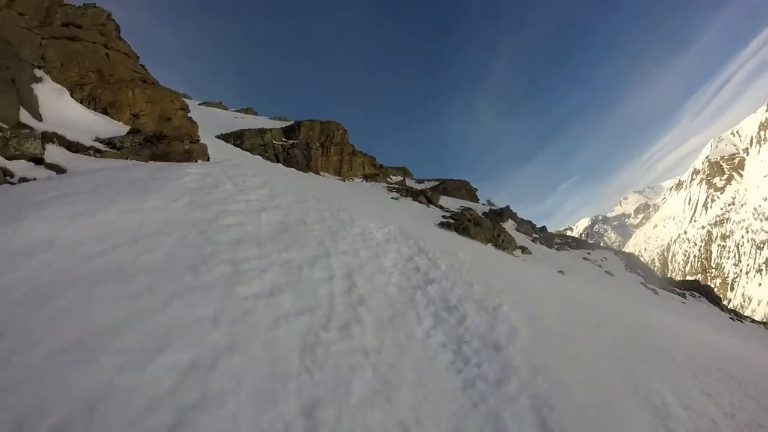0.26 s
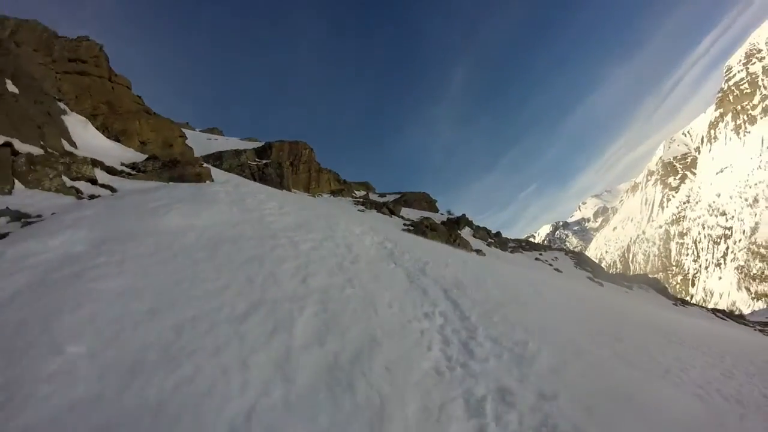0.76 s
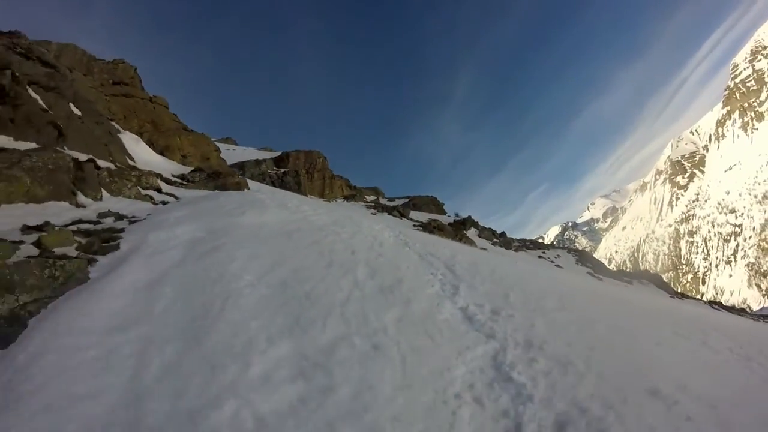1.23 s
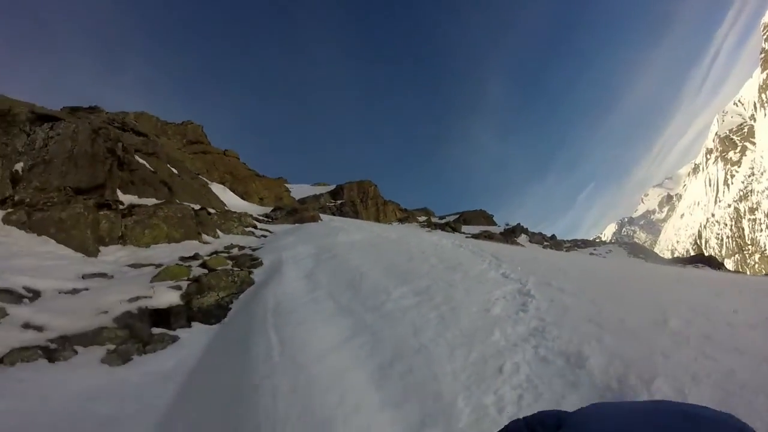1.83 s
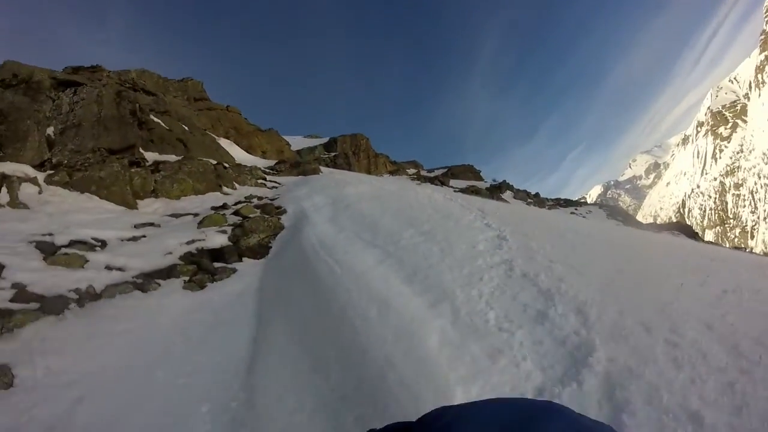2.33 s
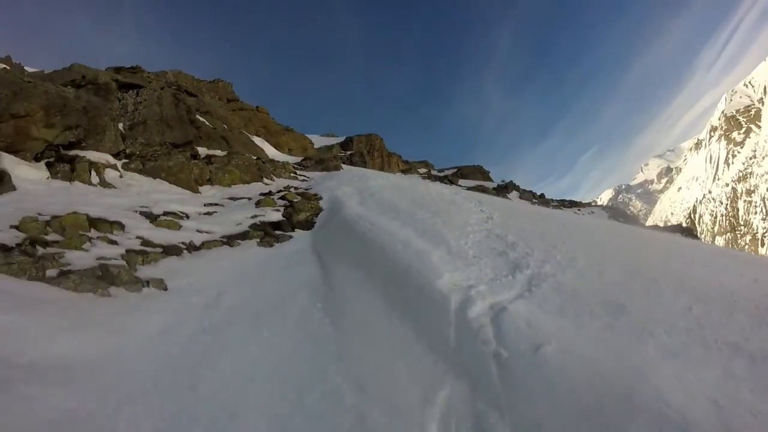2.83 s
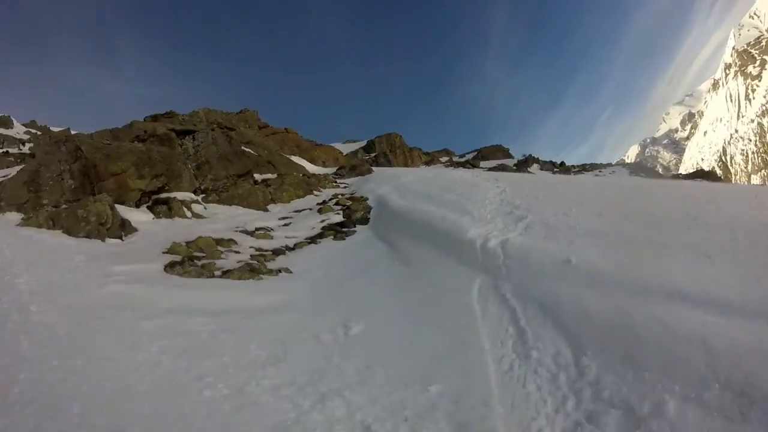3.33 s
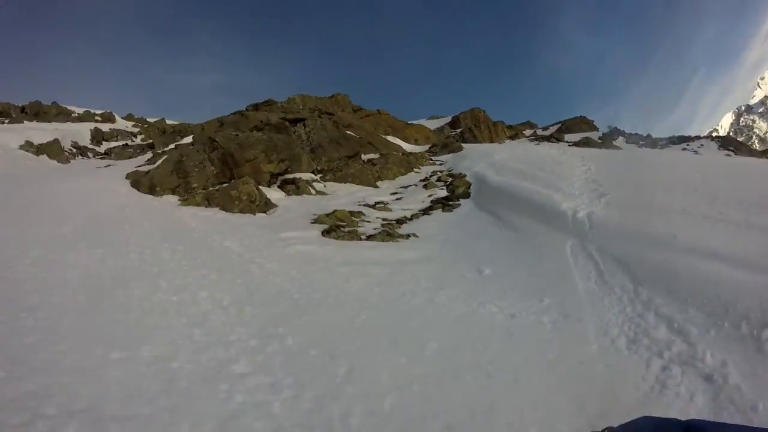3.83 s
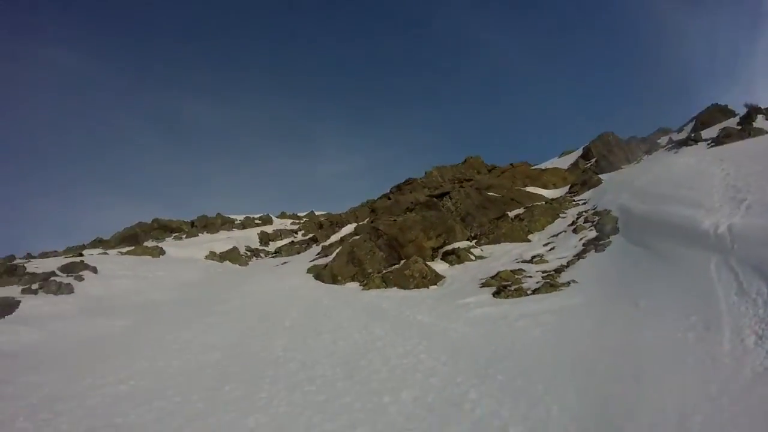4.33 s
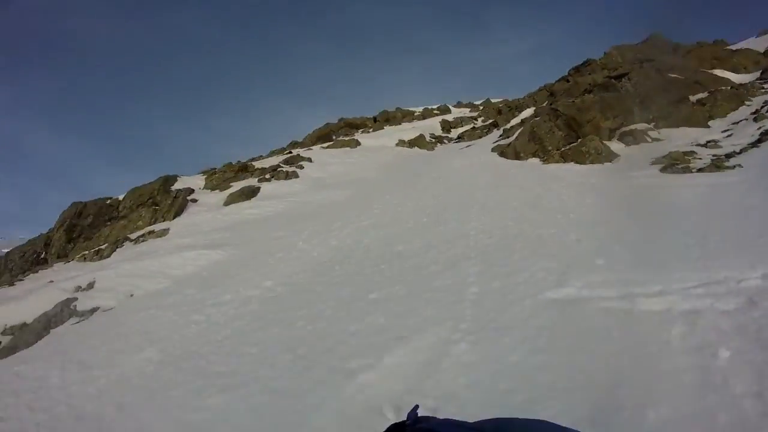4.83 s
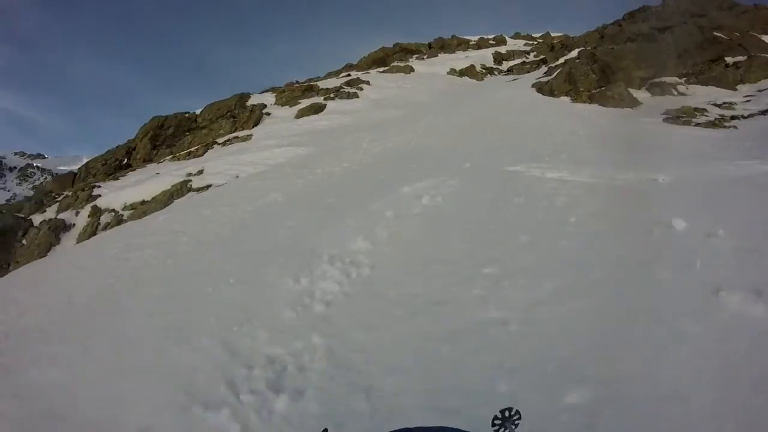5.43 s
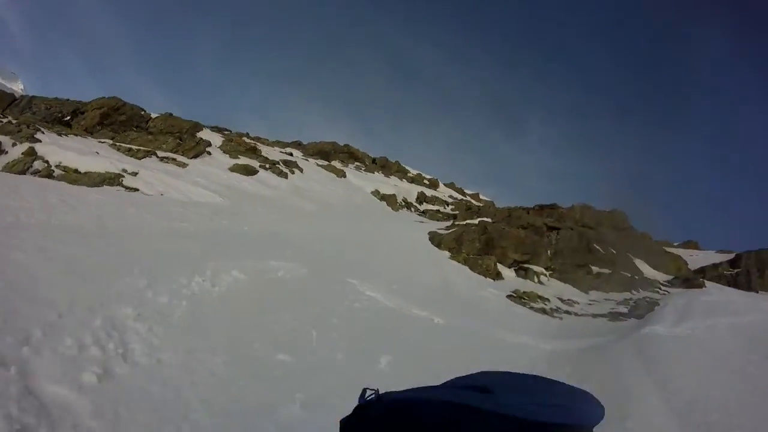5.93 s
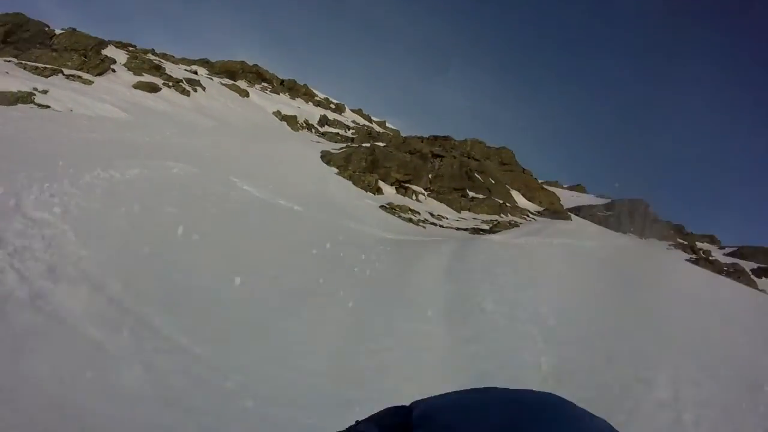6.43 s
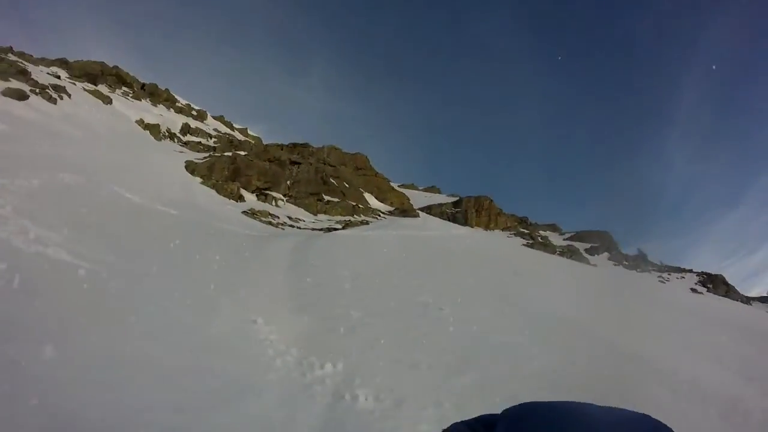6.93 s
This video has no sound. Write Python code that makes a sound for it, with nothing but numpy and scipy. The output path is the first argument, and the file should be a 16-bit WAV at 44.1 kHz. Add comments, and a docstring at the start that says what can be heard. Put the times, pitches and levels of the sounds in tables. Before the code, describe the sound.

Close, boxy and mono: ski edges crunch and hiss over crusted snow outdoors. The scraping comes in waves, one per turn, with a long soft lull, a strong surge, and two short near-silent gaps filled by bright clicks of poles, bindings or buckles. Deep wind buffeting and a shaking mount rumble underneath, swelling in gusts, and the last turn scrapes on unfinished.

```python
"""Skiing down firm snow

A skier runs down firm snow, heard by a body-worn camera in a plastic housing. The edges scrape through the
turns as filtered grains and noise, bite in narrow bands, and fall quiet when the skis are unweighted.
Gear clicks and rattles as short ringing bursts. Wind and body shake are shaped noise and decaying sines;
the housing's resonances colour the scrape, the gear and the rush of air."""
import sys
import numpy as np
from scipy import signal
from scipy.fft import rfft, irfft
from scipy.io import wavfile

SR = 44100
rng = np.random.default_rng(int(sys.argv[2]) if len(sys.argv) > 2 else 0)


def output_pcm(signal):
    """Save a mono or channel-first signal as 16-bit PCM at the path in sys.argv[1].

    Samples are clipped to [-1, 1] before scaling.
    """
    pcm = np.clip(np.atleast_2d(signal).T, -1, 1) * 32767
    wavfile.write(sys.argv[1], SR, np.round(pcm).astype(np.int16))


N = 316197
HZ = np.fft.rfftfreq(N, 1 / SR)
TIME = np.arange(N) / SR

# One curve per turn, from setting the edge to unweighting. Each row: time in seconds, edge pressure as
# level in dB, firmness of the crust in dB.
TURN_CURVES = [
    [(0.0, -32.5, 1.5), (0.25, -33, 2), (0.45, -30.5, 1), (0.75, -31, -1), (1.02, -33.5, -.5),
     (1.33, -34, -0.5), (1.62, -31, 0.5), (1.86, -34, -2.5), (2.16, -46, -4)],
    [(2.195, -44, -1.5), (2.42, -43, 1.5), (2.84, -43.5, 1), (3.04, -34, 2.5), (3.16, -27.5, 0),
     (3.6, -24.5, -3), (3.8, -29.5, 0), (4.05, -33, 1), (4.21, -46.5, 2.5)],
    [(4.6, -34.5, 0), (4.7, -34.5, 1.5), (4.8, -30.5, 2.5), (5.15, -30.5, 3), (5.58, -28, 0.5),
     (5.72, -25.5, -2), (5.97, -36, -1.5), (6.08, -36.5, -1.5), (6.15, -46.5, -2)],
    [(6.378, -32, 0.5), (6.6, -30.5, 0.5), (6.72, -27.5, -1), (6.85, -26.5, -3.5), (7.0, -29, -1),
     (7.08, -26.5, 0.5), (7.17, -28.5, -2.5)],
]


def scrape(shell_db, pressure_db, grains_per_s=3400, spread_db=1.2, hiss_db=-3, chatter_rms_db=0.84,
           patchy_rms_db=0.92, spray_grit=0.7):
    """Crust breaks in countless grains under the chattering edges and throws up a smoother spray of powder."""
    # Scraped snow. Each row: frequency in Hz, spectrum level in dB per Hz.
    snow = [(200, -14), (480, -21), (750, -11.5), (1100, -13), (1700, -3), (2400, -1.5), (3200, 2),
            (4200, -16.5), (5200, -20.5), (7200, -22), (9500, -30), (15000, -50.5)]
    # Layers following edge pressure. Each: level in dB at a steady glide, dB gained per dB of pressure.
    body_law = (-38, 0.92)
    spray_law = (-49, 0.87)
    spray_per_crust = -0.3  # dB per dB: firm crust gives more body and less powder

    sizes = gain_of(spread_db * np.minimum(rng.exponential(1, N), 5))
    signed_sizes = sizes * rng.choice([-1, 1], N)
    grains = evened(signed_sizes * (rng.random(N) < grains_per_s / SR))
    hiss = rng.standard_normal(N)
    chatter_db = chatter_rms_db * wobble(18, 100)

    timbre_db = read(snow) + shell_db
    crunch = colour((grains + gain_of(hiss_db) * hiss) * gain_of(chatter_db), timbre_db)
    powder = colour((spray_grit * grains + hiss) * gain_of(0.5 * chatter_db), timbre_db)

    # each range of the ski's vibration swells on its own as clumps pass under it
    ranges_hz = [(100, 1290), (1290, 1750), (1750, 2400), (2400, 4600)]
    deep, low, mid, high = (
        band(crunch, *limits) * gain_of(patchy_rms_db * wobble(5.9, 81)) for limits in ranges_hz)
    fine = band(powder, 4600, 20000)

    firmness_db = crust()
    body_db = driven(pressure_db, body_law) + firmness_db
    spray_db = driven(pressure_db, spray_law) + spray_per_crust * firmness_db
    parts = [(deep + low, body_db), (mid + high, pressure_db), (fine, spray_db)]
    return sum(evened(x) * gain_of(db) for x, db in parts)


def edge_pressure(uneven_rms_db=0.7, slow_hz=9, fast_hz=24):
    """Level in dB of the skis' grip: powers of turns and scuffs add to a light glide on uneven snow."""
    # A ski slaps down or breaks through crust. Each row: start in seconds, length in seconds, level in dB.
    scuffs = [(2.189, .025, -41), (3.37, .03, -26), (3.622, 0.022, -25.5), (4.242, 0.049, -44.5),
              (4.301, 0.048, -46.5), (4.56, 0.036, -36), (4.591, 0.057, -34.5), (4.995, .03, -30.5),
              (5.135, .035, -31), (5.338, .035, -28.5), (6.218, 0.092, -53), (6.301, 0.037, -44),
              (6.336, 0.039, -38), (6.38, 0.09, -37.5)]
    grip_db_per_s, release_db_per_s = 3000, 400
    unweighted_db, scuff_attack_s = -56.5, 0.0013

    power = gain_of(unweighted_db) ** 2
    for turn in TURN_CURVES:
        s, db, _ = np.transpose(turn)
        before_db = grip_db_per_s * np.maximum(s[0] - TIME, 0)
        after_db = release_db_per_s * np.maximum(TIME - s[-1], 0)
        power = power + gain_of(np.interp(TIME, s, db) - before_db - after_db) ** 2
    for s, length_s, db in scuffs:
        t = np.arange(0, length_s, 1 / SR)
        onset = 1 - np.exp(-t / scuff_attack_s)
        add(power, s, (gain_of(db) * onset) ** 2 * (1 - (t / length_s) ** 2))
    return 10 * np.log10(power) + uneven_rms_db * wobble(slow_hz, fast_hz)


def crust():
    """Firmness of the snow under the skis in dB, interpolated through all turns."""
    s, _, db = np.vstack(TURN_CURVES).T
    return np.interp(TIME, s, db)


def driven(pressure_db, law):
    """Level in dB of a layer that follows the edge pressure."""
    cruise_db = -31.5  # edge pressure of a steady glide
    level_db, slope = law
    return level_db + slope * (pressure_db - cruise_db)


def bites(rough_rms_db=4.0, attack_s=0.0018):
    """A freshly set edge sticks and slips, singing in one narrow noise band as it fades."""
    # Each row: start in seconds, length in seconds, level in dB, centre in Hz, -6 dB width in Hz.
    bite_rows = [(2.191, 0.019, -43, 1480, 260), (2.193, 0.31, -46.5, 1250, 160),
                 (2.288, 0.15, -46.5, 1228, 80), (4.3, 0.05, -50, 1510, 120),
                 (4.402, 0.022, -49, 1510, 170), (4.561, 0.043, -41, 1220, 160),
                 (6.335, 0.068, -44, 1260, 180)]
    out = np.zeros(N)
    for s, length_s, db, hz, width_hz in bite_rows:
        t = np.arange(0, length_s, 1 / SR)
        ring_db = -20 * np.log10(1 + (2 * (HZ - hz) / width_hz) ** 2)
        ring = noise(ring_db)[:len(t)]
        envelope = (1 - np.exp(-t / attack_s)) * np.sqrt(1 - (t / length_s) ** 2)
        add(out, s, gain_of(db) * evened(ring * envelope))
    return out * gain_of(rough_rms_db * wobble(11, 90))


def gear(shell_db, shell_share=0.3, rattle_fade_db=4, rattle_ring_db=6, rattle_ring_width=0.3):
    """Single knocks and one ratcheting run of ticks, heard through the housing."""
    # Skis, bindings, poles and buckles knocking. Each row: start in seconds, level in dB,
    # brightness in dB per octave, decay in seconds, ring of the part in Hz.
    clicks = [(4.2037, -22, 0, 0.0023, 6250), (4.2138, -36, -5.5, 0.0018, 5600),
              (4.244, -40, -7, .008, 2320), (4.2816, -21, 1.5, 0.001, 8900), (4.286, -31, 0, 0.0026, 8400),
              (4.3387, -33, 0.5, 0.0018, 13000), (4.402, -35, -4, 0.0055, 2600),
              (4.4727, -31, -0.5, 0.0036, 2500), (4.481, -33, 0, 0.002, 4500),
              (4.5105, -39, 0, 0.0024, 2720), (4.601, -23.5, -1, 0.0011, 4350),
              (5.342, -31, -4, 0.0018, 8750), (6.168, -23.5, 0.5, 0.0056, 2480),
              (6.173, -32, -0.5, 0.0034, 4500), (6.1913, -43, -2, 0.022, 2500),
              (6.2682, -34, -8, 0.0023, 1400), (6.293, -39, 1, 0.003, 6270),
              (6.377, -31, -0.5, 0.008, 2400), (6.446, -36, 2, .006, 9000), (6.6943, -30, 2, .003, 7860)]
    # One rattle: start in seconds, length in seconds, ticks per second, level in dB,
    # brightness in dB per octave, decay in seconds, ring in Hz.
    rattle = (6.1926, .026, 220, -33.5, 2.5, .002, 9200)
    # Knocked gear. Each row: frequency in Hz, spectrum level in dB per Hz.
    knock = [(100, -16), (350, -4.5), (700, -4), (1400, -2), (2400, 10), (3300, 4.5), (4500, 2.5),
             (6000, -5.5), (9000, -9.5), (11000, -17), (15000, -26)]

    out = np.zeros(N)
    body_db = read(knock) + shell_share * shell_db
    for s, *blow in clicks:
        add(out, s, click(body_db, *blow))
    start_s, length_s, ticks_per_s, db, *tick = rattle
    for t in np.arange(0, length_s, 1 / ticks_per_s):
        tick_db = db - rattle_fade_db * t / length_s
        add(out, start_s + t, click(body_db, tick_db, *tick, rattle_ring_db, rattle_ring_width))
    return out


def click(body_db, db, bright_db, decay_s, ring_hz, ring_db=12, ring_width=0.099):
    """A hard contact: one crack, then tiny impacts that die in milliseconds and ring the part they strike."""
    crack = 2.2  # first impact relative to the next ones
    envelope = np.exp(-TIME[:4096] / decay_s)
    impacts = np.r_[crack, rng.choice([-1, 1], len(envelope) - 1)] * envelope
    tilt_db = bright_db * np.log2(np.maximum(HZ, 500) / 4000)
    # ring_width is a fraction of ring_hz
    peak_db = ring_db / (1 + (2 * (HZ / ring_hz - 1) / ring_width) ** 2)
    sound = colour(impacts, body_db + tilt_db + peak_db)
    # same energy as the bare envelope at this level
    return gain_of(db) * sound * np.linalg.norm(envelope) / np.linalg.norm(sound)


def jolts():
    """Sudden moves of the body set the mount swinging for a few cycles: decaying sines."""
    # Each row: start in seconds, level in dB, frequency in Hz, decay in seconds.
    jolt_rows = [(4.5, -27.5, 120, 0.017), (6.089, -33, 134, 0.024), (6.112, -27.5, 132, 0.014)]
    out, t = np.zeros(N), TIME[:SR // 6]
    for s, db, hz, decay_s in jolt_rows:
        add(out, s, -gain_of(db) * np.sin(2 * np.pi * hz * t) * np.exp(-t / decay_s))
    return out


def wind(shell_db, pressure_db, air_db=-56, air_follow=0.32, shake_rms_db=1.9, eddy_rms_db=0.5):
    """Eddies push on the housing, shake its mount and leave a faint rush of air; all grow with edge pressure."""
    # Spectra of eddies, mount and air. Each row: frequency in Hz, level in dB per Hz.
    buffet = [(5, -1.5), (18, 0), (36, -2.5), (50, -13), (70, -21.5), (110, -37), (200, -34.5), (600, -84)]
    mount = [(50, -6.5), (85, -7.5), (105, -2.5), (120, 2.5), (135, -5.5), (160, -16.5), (200, -46),
             (400, -36), (900, -86)]
    air = [(100, -10), (250, 2), (420, -8.5), (600, 1), (1000, -25), (2500, -19.5), (5000, -16),
           (9000, -16.5), (15000, -24)]
    # Each law: level in dB at a steady glide, dB gained per dB of pressure.
    buffet_law = (-37.5, 0.68)
    drone_law = (-45.5, 0.71)
    # Gusts on the microphone, bumpy snow shaking the mount. Each row: centre in seconds,
    # half width in seconds (to 1/e), lift in dB.
    gusts = [(.5, 0.43, 2.5), (2.0, 0.092, 6.5), (2.97, 0.047, 11), (3.6, 0.27, 3), (4.15, 0.18, 9),
             (4.62, 0.19, 10), (5.75, 0.16, 4.5), (6.8, 0.21, 4.5)]
    bumps = [(.55, 0.39, 9), (1.55, 0.39, 6), (3.3, 0.054, 4.5), (4.3, 0.077, 12), (6.3, 0.049, 12.5),
             (6.85, 0.11, 10.5)]
    still_db = -43.5  # below this pressure wind and shake fall no further

    effort_db = np.maximum(pressure_db, still_db)
    buffet_db = driven(effort_db, buffet_law) + swells(gusts) + eddy_rms_db * wobble(0.67, 7.6)
    drone_db = driven(effort_db, drone_law) + swells(bumps)
    rumble = noise(read(buffet)) * gain_of(buffet_db)
    shake = noise(read(mount)) * gain_of(drone_db + shake_rms_db * wobble(8.1, 27))
    rush_db = air_db + air_follow * (drone_db - drone_db.mean())
    rush = noise(read(air) + shell_db) * gain_of(rush_db)
    return rumble + shake + rush


def swells(rows):
    """Bell-shaped lifts in dB."""
    return sum(db * np.exp(-((TIME - s) / width_s) ** 2) for s, width_s, db in rows)


def housing():
    """Gain in dB of the camera's plastic shell: a sum of resonance peaks."""
    # Each row: frequency in Hz, width in Hz, lift in dB.
    resonances = [(374, 118, 9.5), (427.6, 24, 11.5), (950, 210, 14.5), (1198, 115, 15.5), (1357, 184, 14),
                  (1517, 146, 12.5), (1733, 51, 7.5), (1946, 195, 8.5), (2118, 180, 13), (2289, 121, 12),
                  (2515, 132, 13.5), (2774, 223, 12), (3090, 53, 4), (3350, 110, 4.5), (3912, 450, 11),
                  (4540, 275, 9.5), (5650, 620, 7), (6190, 710, 11), (8016, 780, 10.5), (11491, 400, 2)]
    return sum(db / (1 + (2 * (HZ - hz) / width_hz) ** 2) for hz, width_hz, db in resonances)


def gain_of(db):
    """Decibels to amplitude."""
    return 10 ** (np.asarray(db) / 20)


def evened(x):
    """Scales to rms 1."""
    return x / np.sqrt(np.mean(x ** 2) + 1e-20)


def read(points):
    """A spectrum in dB on the frequency grid, interpolated over log frequency."""
    hz, db = np.transpose(points)
    return np.interp(np.log(HZ + 1), np.log(hz + 1), db)


def add(mix, s, sound):
    """Mixes a sound in at time s in seconds."""
    part = mix[round(s * SR):][:len(sound)]
    part += sound[:len(part)]


def colour(x, db, size=8192):
    """Causal minimum-phase filter with the given gain: its resonances ring after each impulse."""
    log_gain = np.log(gain_of(np.interp(np.fft.rfftfreq(size, 1 / SR), HZ, db)))
    circle = np.r_[log_gain, log_gain[-2:0:-1]]
    response = np.exp(np.conj(signal.hilbert(circle)))
    taps = np.fft.ifft(response).real[:size // 2]
    return signal.oaconvolve(x, taps)[:len(x)]


def band(x, lo_hz, hi_hz):
    """The part of x between two frequencies, with steep, smooth edges."""
    return irfft(rfft(x) * (below(hi_hz) - below(lo_hz)), N)


def below(hz, order=12):
    """Low-pass weights on the frequency grid."""
    return 1 / (1 + (HZ / hz) ** order)


def noise(db):
    """Noise of rms 1 with the given spectrum."""
    return evened(irfft(rfft(rng.standard_normal(N)) * gain_of(db), N))


def wobble(slow_hz, fast_hz):
    """Random unevenness of rms 1, about equally strong in each octave between two rates."""
    weight = (below(fast_hz) - below(slow_hz)) / np.sqrt(HZ + 1)
    return evened(irfft(rfft(rng.standard_normal(N)) * weight, N))


def scene():
    """Skis, gear and wind at one microphone."""
    shell_db, pressure_db = housing(), edge_pressure()
    skis = scrape(shell_db, pressure_db) + bites()
    knocks = gear(shell_db) + jolts()
    return (skis + knocks + wind(shell_db, pressure_db))[None]


def record(dry):
    """The camera's band limit: a linear-phase low-pass."""
    edge_hz = 15200
    taps = signal.firwin(511, edge_hz, window=("kaiser", 9), fs=SR)
    return signal.oaconvolve(dry, taps[None], "same")


dry = scene()
out = record(dry)
output_pcm(out)
```